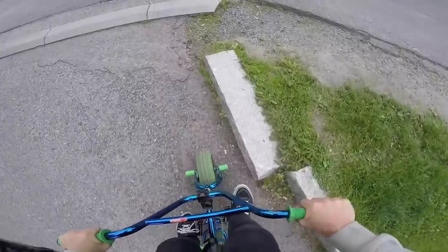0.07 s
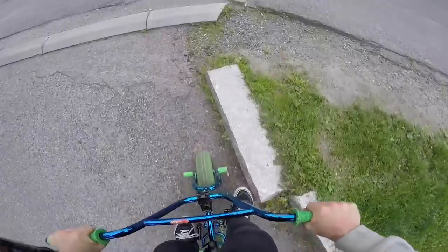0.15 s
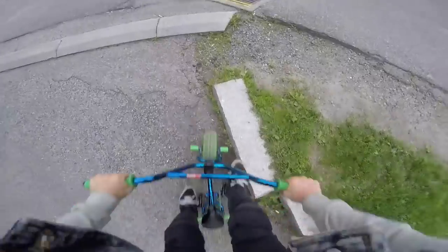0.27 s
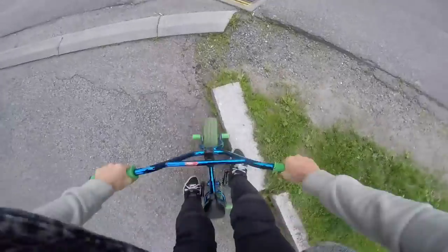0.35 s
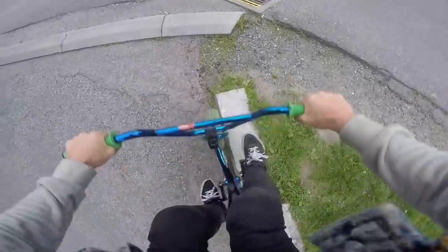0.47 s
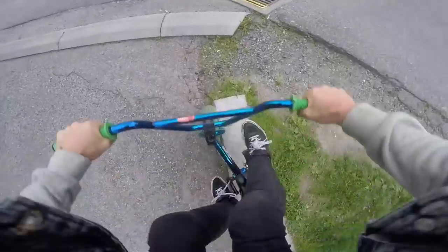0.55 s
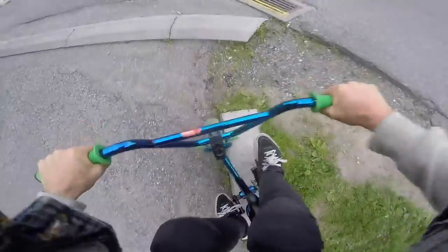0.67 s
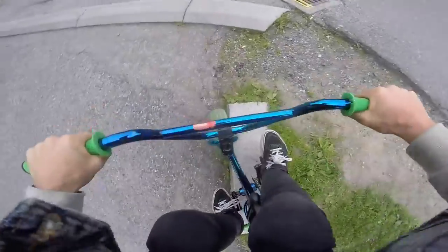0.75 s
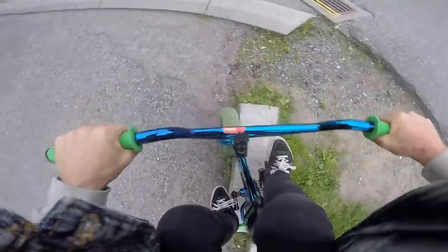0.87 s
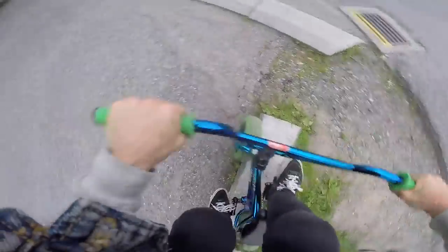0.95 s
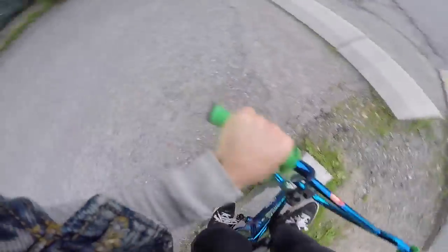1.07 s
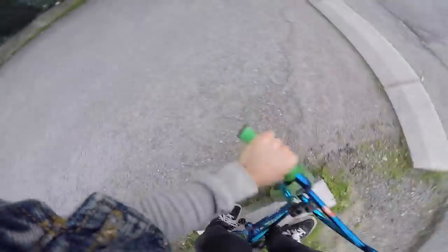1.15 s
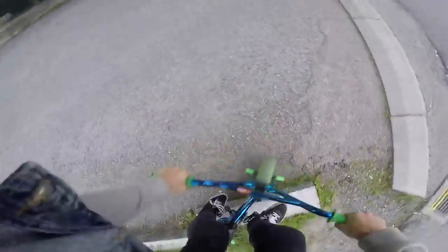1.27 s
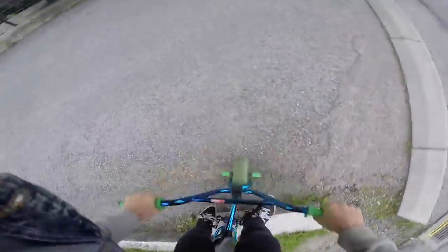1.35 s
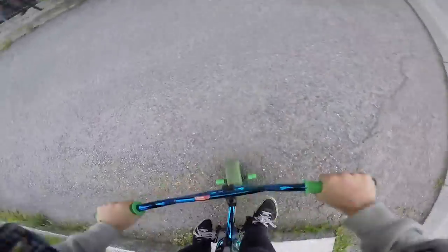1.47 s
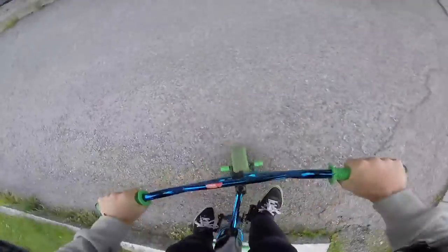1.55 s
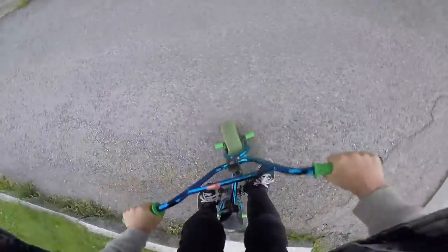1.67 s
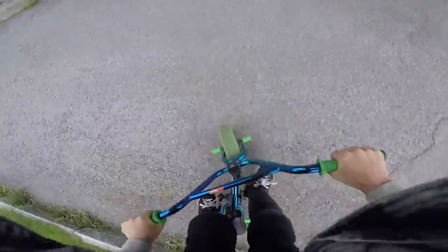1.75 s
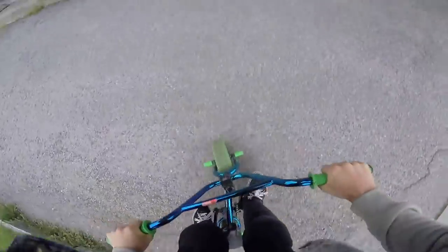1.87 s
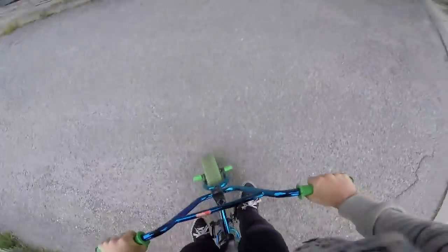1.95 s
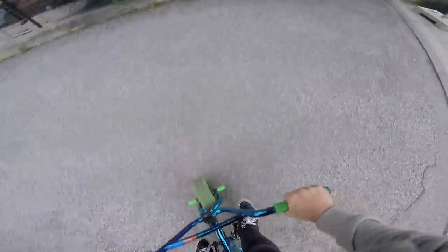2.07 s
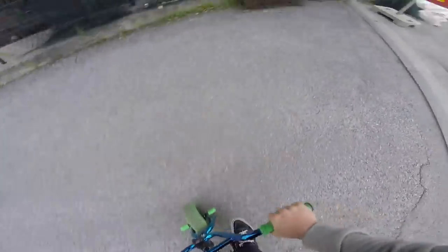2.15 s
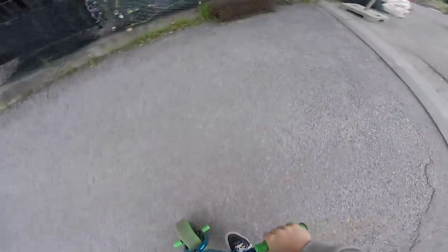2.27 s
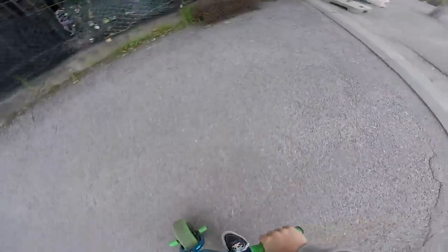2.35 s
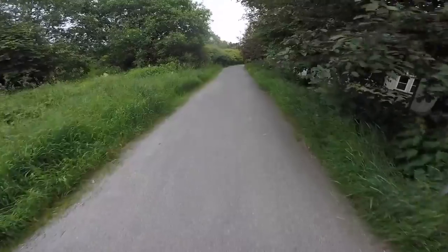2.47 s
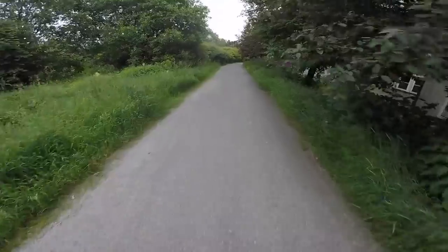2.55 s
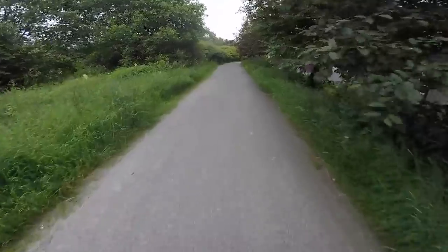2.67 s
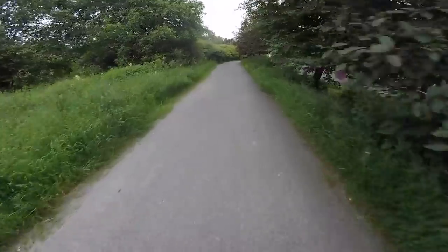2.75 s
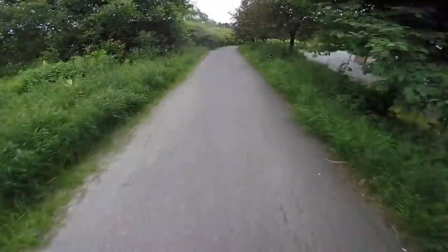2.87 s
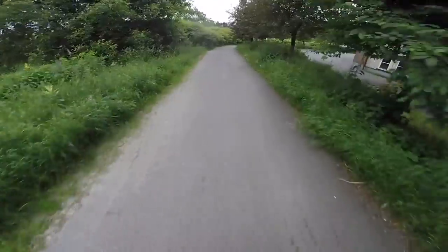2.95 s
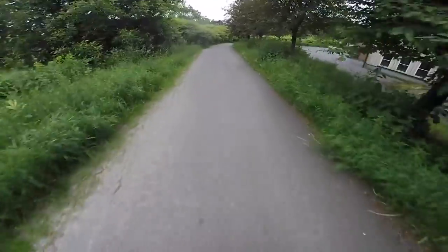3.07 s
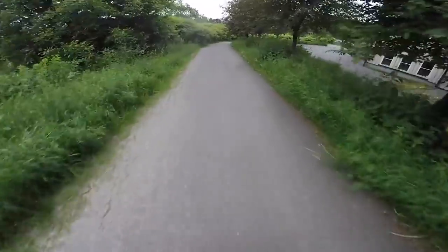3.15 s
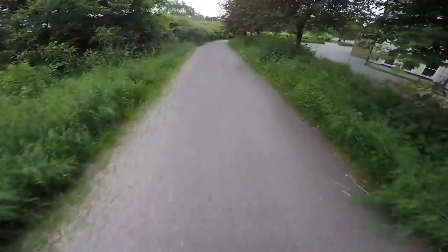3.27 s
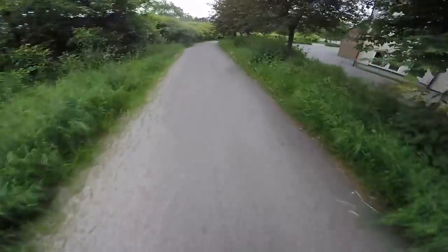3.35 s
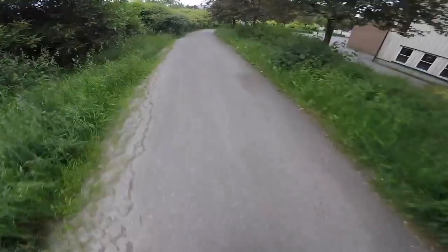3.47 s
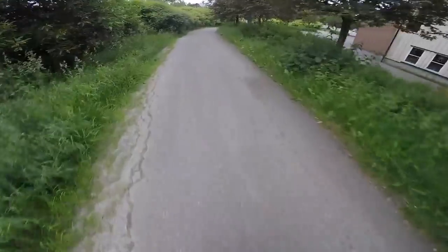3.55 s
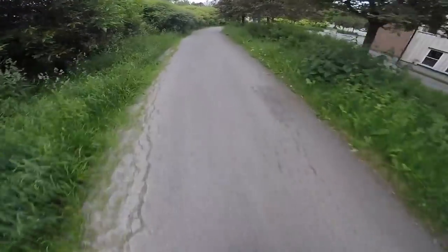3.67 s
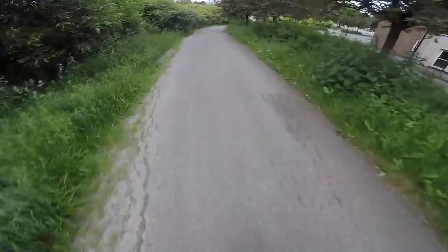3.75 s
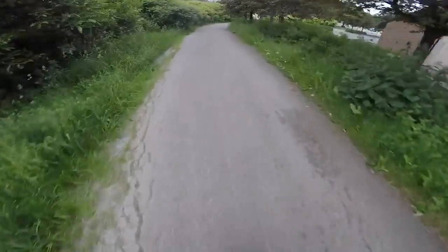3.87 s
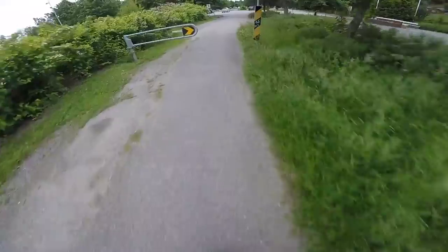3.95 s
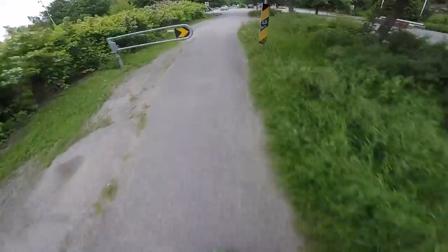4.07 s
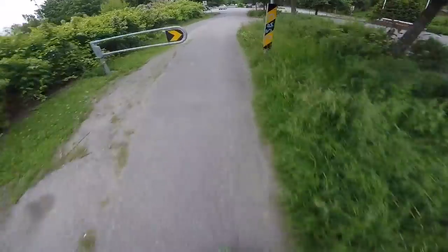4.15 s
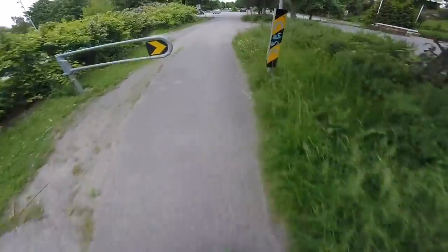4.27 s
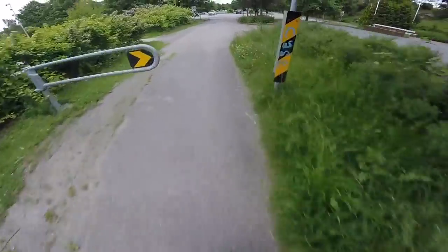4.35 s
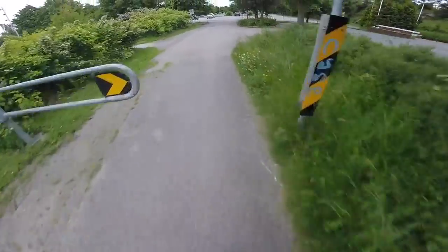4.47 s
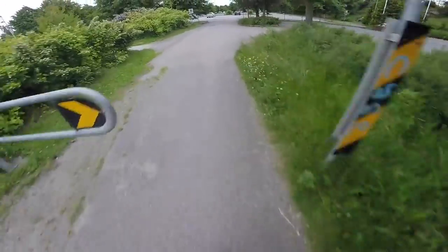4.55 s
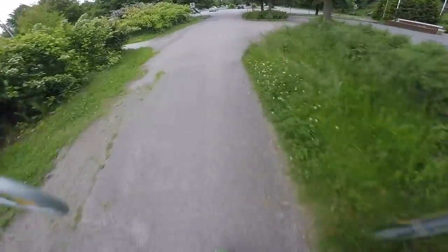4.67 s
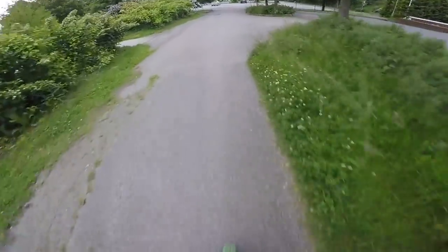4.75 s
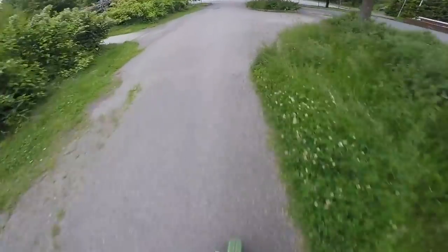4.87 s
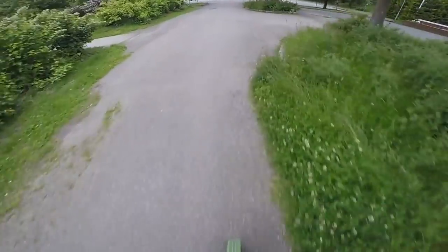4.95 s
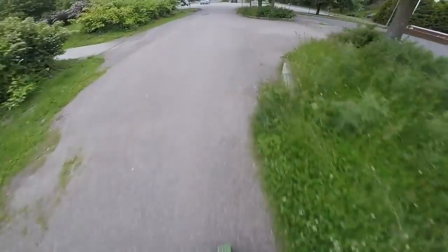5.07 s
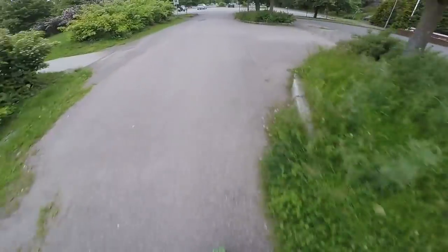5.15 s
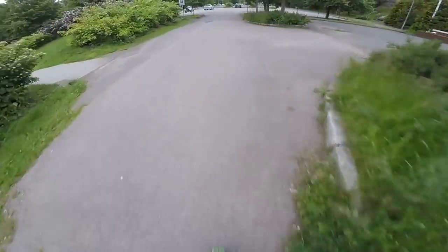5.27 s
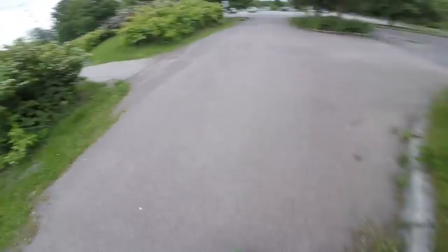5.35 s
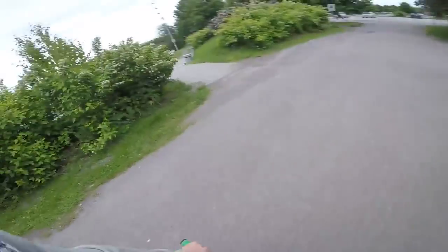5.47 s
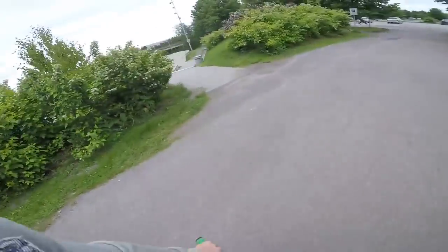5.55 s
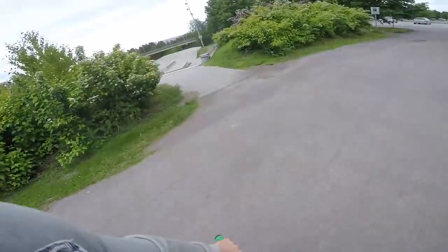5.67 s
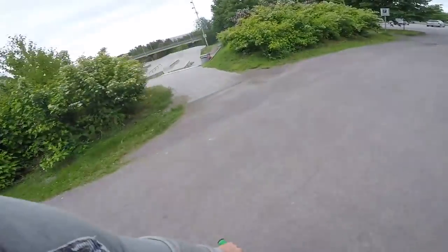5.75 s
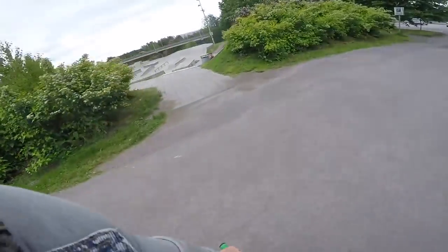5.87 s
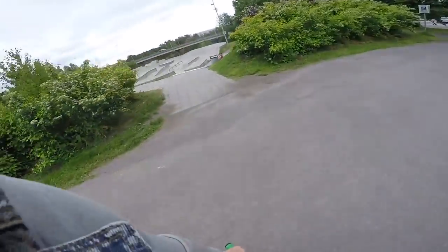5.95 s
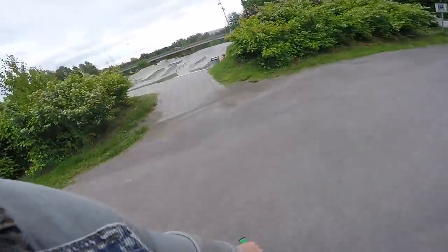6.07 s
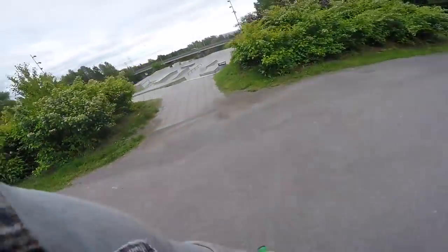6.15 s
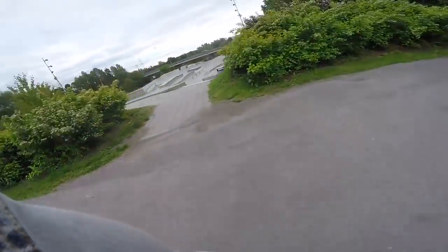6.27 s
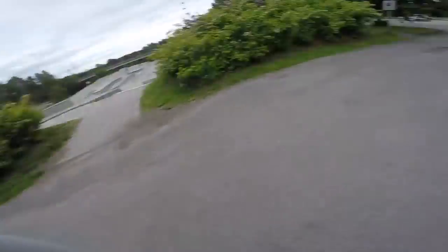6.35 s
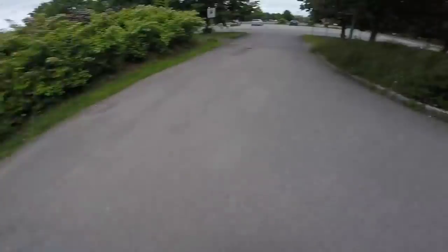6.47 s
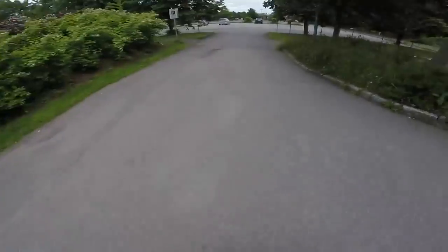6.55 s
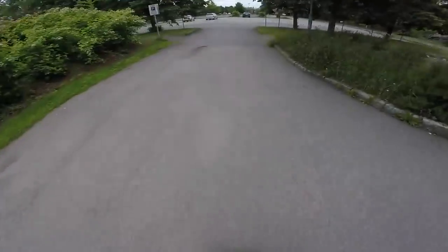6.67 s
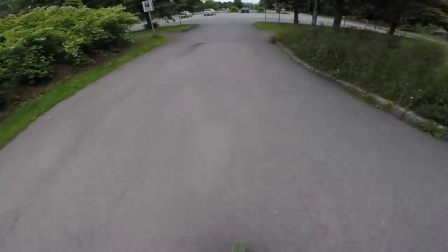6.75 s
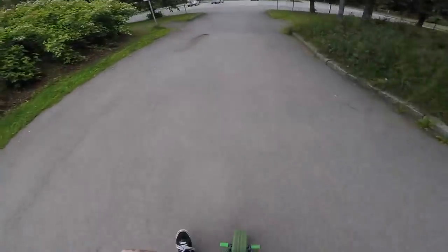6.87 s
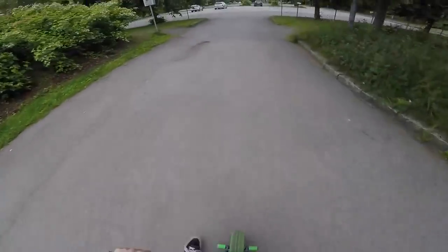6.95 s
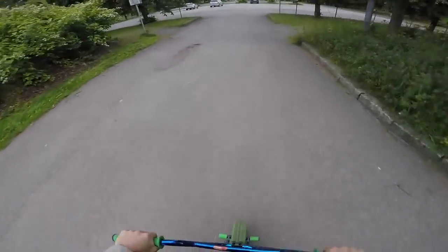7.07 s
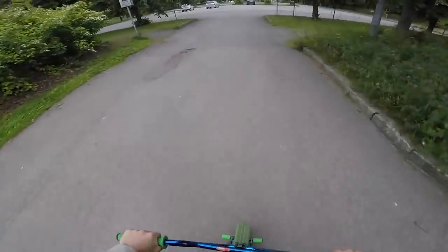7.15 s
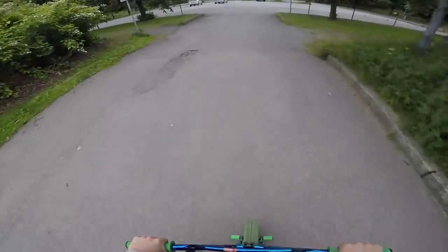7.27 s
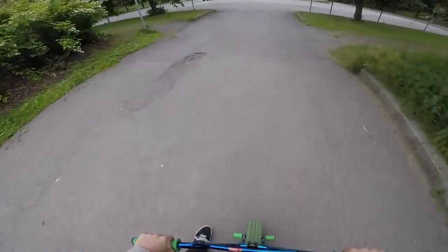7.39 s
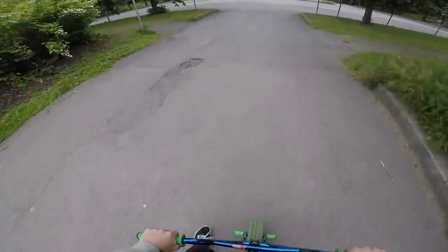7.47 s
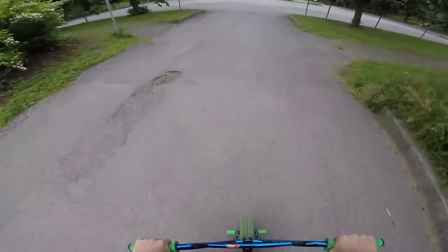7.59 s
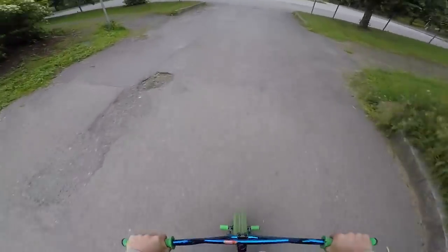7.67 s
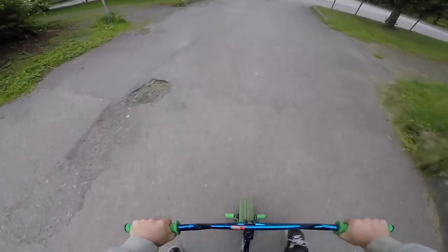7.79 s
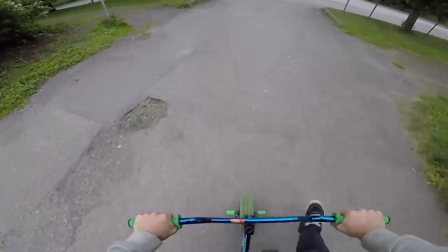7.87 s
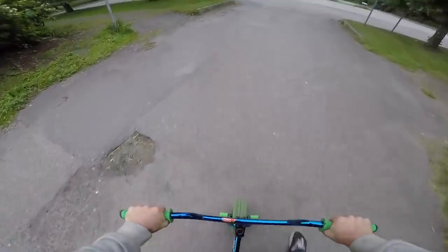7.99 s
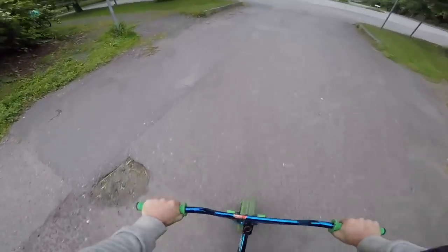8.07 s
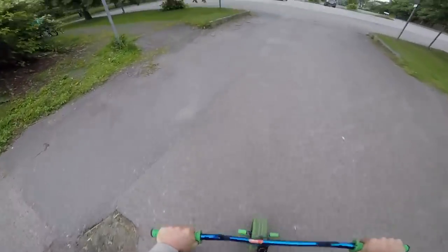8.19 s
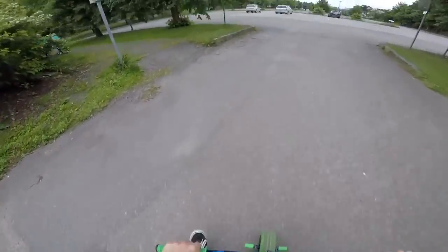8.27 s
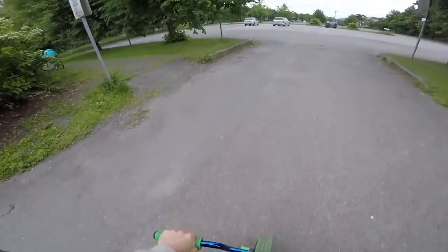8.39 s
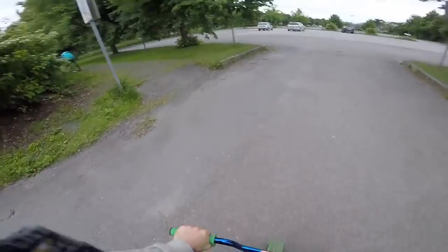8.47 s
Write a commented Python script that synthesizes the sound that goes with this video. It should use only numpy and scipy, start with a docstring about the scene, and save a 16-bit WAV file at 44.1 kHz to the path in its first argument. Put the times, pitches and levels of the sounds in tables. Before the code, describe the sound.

Close on-rider bike ride outdoors: rubber chirps and scuffs at a kerb, ratcheting hub whirr, wind roar, a tyre skid and frame knocks.

```python
"""The wheels of a small stunt bike, heard close by from on the rider: each ratchet tooth clicks and rings the hub.
Their speed drives the ticking and buzzing freewheel and the loudness of the tyres pattering on asphalt.
Loose grit and pebbles snap, rubber chirps and scuffs on a kerb stone, one tyre skids for about half a second,
and knocks ring the frame. Around it all, wind built from shaped noise buffets, slaps and roars at the microphone.
"""
import sys
import numpy as np
from scipy import signal
from scipy.fft import rfft, irfft
from scipy.io import wavfile
from scipy.ndimage import uniform_filter1d

SR = 44100
rng = np.random.default_rng(int(sys.argv[2]) if len(sys.argv) > 2 else 0)


def file_out(sig):
    """Save sig as 16-bit WAV at sys.argv[1]."""
    # one column per channel
    cols = np.atleast_2d(sig).T
    # limit, then scale
    lim = np.clip(cols, -1, 1)
    pcm = np.round(lim * 32767).astype(np.int16)
    wavfile.write(sys.argv[1], SR, pcm)


N = 375732
TIME = np.arange(N) / SR

# wheel speed: time_s, ratchet teeth per second
WHEEL_SPEED = [(0, 57), (.39, 53), (.46, 12.9), (.68, 58), (.78, 2.9), (1.2, 8.3), (1.7, 45), (1.87, 36),
               (2.02, 58), (2.2, 36), (2.53, 78), (2.55, 139), (4.01, 146), (4.03, 178), (5.3, 228),
               (6.6, 188), (6.72, 107), (7.7, 149), (8.3, 102)]
# the freewheel is silent while the rider stands at the kerb and pedals off
PEDALLING_FROM_S, PEDALLING_UNTIL_S = .72, 1.69
# growth of level with each doubling of speed
HUB_DB_PER_DOUBLING, ROLL_DB_PER_DOUBLING = 2.5, 3.5

# spectrum of a click of the pawls (the small catches in the hub): pitch_hz, level_db
PAWL_COLOUR = [(600, -12.5), (2600, -10.5), (3300, -5), (4800, -1.5), (5700, -4.5), (6500, -10.5),
               (7250, -12), (8000, -13.5), (9600, -11.5), (11000, -13), (12200, -4), (13000, -13),
               (14400, -10.5), (15300, -21)]
# decay times of tick and rattle; levels of the rattle and of the sliding between ticks
PAWL_TICK_S, PAWL_RATTLE_S, PAWL_RATTLE_DB, PAWL_SLIDE_DB = .0014, .004, -22, -23
# ringing of the hub shell and sprocket: pitch_hz, width_hz, level_db
HUB_MODES = [(3380, 200, -6), (3410, 30, 5), (3980, 130, -3), (4025, 20, 8), (4700, 400, -7), (5202, 24, 5),
             (5296, 20, 6), (5500, 600, -8), (7180, 320, -3), (8480, 160, -9), (8950, 150, -7),
             (9292, 22, 0), (9510, 60, 2), (10450, 130, -7), (11450, 110, -9), (12250, 750, -2),
             (15150, 350, -4)]
# pitches that stand out or fade in the wheel's ring; the first is perhaps a faint brake squeak:
# centre_s, half_length_s, pitch_hz, change_db
RING_SWELLS = [(0.617, .07, 10900, 15), (2.703, .3, 7230, 6.5), (2.85, 0.47, 4000, 6.5),
               (3.552, 0.52, 3410, 5.5), (3.822, 0.2, 12800, 0.5), (4.95, 0.49, 3410, 4.5),
               (5.2, 0.3, 4000, 6.5), (5.4, 1, 5300, 4.5), (6.05, 0.54, 7230, 7.5), (6.15, 0.32, 10900, 11),
               (6.25, 0.35, 4300, -12), (6.248, .2, 9400, -7), (7.85, 0.68, 5300, 6.5)]
RING_SWELL_OCTAVES = .13  # a swell changes the modes this close to its pitch
# how well the microphone faces the rear hub: time_s, level_db
HUB_AIM = [(1.7, 0), (2.53, 0.5), (2.55, 1.5), (4.01, 1.5), (4.03, -3.5), (5.2, -3), (5.7, -6.5),
           (7.5, -7.5), (7.9, 0.5), (8.52, -3)]
# the rider's body screens the wheels: from, until, time to turn away, time to turn back, depth
SCREEN_FROM_S, SCREEN_UNTIL_S, SCREEN_IN_S, SCREEN_OUT_S, SCREEN_DB = 6.06, 6.4, 0.06, 0.33, -7
# pitches that partly cancel on the way from the wheels: pitch_hz, width_hz
HOLLOWS = [(1450, 220), (2750, 250), (3680, 220), (4270, 160), (6650, 400), (8100, 450), (11000, 450)]
HOLLOW_DB = -4.5
# the wheels' reflection off the road: gain, delay, wander of the delay
WHEEL_ECHO, WHEEL_ECHO_S, ECHO_WANDER_S = .22, .0017, .00006

# spectrum of tread on asphalt: pitch_hz, level_db
TREAD_COLOUR = [(80, -21.5), (250, 9), (550, 3), (1150, 0.5), (1450, 3), (1850, 0), (2500, -5),
                (3300, -4.5), (5000, -9), (9000, -17.5), (15000, -18.5)]
# coarseness of the asphalt, stretch by stretch: start_s, level_db
SURFACES = [(0, 1.5), (2.54, -1), (4.02, -1.5), (5.42, -7), (6.05, -8), (6.6, -4)]
# spectrum of crushed grit: pitch_hz, level_db
STONE_COLOUR = [(400, -12), (1300, 0.5), (2000, -4.5), (2800, 0), (3700, -3), (4900, -9), (6500, -27),
                (15000, -24)]
# patches of loose grit: start_s, length_s, level_db
GRIT_PATCHES = [(0, 0.35, -39), (0.113, 0.26, -35), (1.527, 0.018, -30.5), (1.649, 0.43, -36.5),
                (2.35, 0.93, -61)]
GRIT_ATTACK_S, GRIT_RELEASE_S = 0.021, 0.059
# single stones snapping under the tread: start_s, relative_level_db, ring_pitch_hz
PEBBLES = [(0.1399, -13.5, 2800), (.153, -19, 3050), (0.204, -17, 2900), (0.244, -19, 2980),
           (0.3343, -19, 3300), (0.3665, -20, 2900), (1.383, -18, 1290), (1.505, -12.5, 3380),
           (1.544, -13, 3000), (1.5767, -21, 2800), (1.6333, -11, 2850), (1.6865, -21, 2810),
           (1.7604, -12, 3880), (1.779, -10, 2680), (1.944, -13.5, 1760), (2.0783, -23.5, 3400),
           (2.425, -22, 2800), (7.03, -13, 4440)]
PEBBLE_RING_DB, PEBBLE_WIDTH_HZ = 5, 370

# spectrum of sliding rubber: pitch_hz, level_db
SKID_COLOUR = [(210, -41), (350, -4.5), (502, -8), (570, -1.5), (721, -6), (831, -4), (1090, -6),
               (1460, -6.5), (1900, -11), (2350, -20), (2830, -22.5), (4130, -16.5), (5400, -24.5),
               (6520, -32), (15000, -35.5)]
# the tyre locks, bites hardest, starts to let go, rolls again
SKID_START_S, SKID_BITE_S, SKID_EASE_S, SKID_END_S = 6.992, 7.18, 7.535, 7.643
SKID_ATTACK_S, SKID_RELEASE_S = 0.0014, 0.091
# weight comes onto the tyre: level at full bite, swell up to it
ROAR_DB, ROAR_SWELL_DB_PER_S = -18.5, 35
# the slide dulls as it slows: brightness (see tilted) and its fall
SKID_TILT_DB, SKID_DULLING_DB_PER_S = -1, 4.5
# harsh rasp under full weight, falling in pitch as the tyre slows: centre, half length, level, fall
RASP_S, RASP_HALF_S, RASP_DB, RASP_FALL_OCTAVES_PER_S = 7.41, 0.16, -33, 1.9
# short dips in level as the tyre hops: centre_s, half_length_s, dip_db
HOPS = [(7.064, 0.013, -7.5), (7.199, 0.044, -6)]
# rough squeals within the skid: centre_s, half_length_s, pitch_hz, level_db
SQUEALS = [(7.138, 0.052, 1810, -31), (7.312, 0.072, 1805, -25.5), (7.37, 0.088, 1071, -24),
           (7.43, 0.056, 653, -21.5), (7.62, .02, 1700, -24), (7.468, .07, 1400, -36),
           (7.522, 0.064, 755, -18.5)]
SQUEAL_FALL_OCTAVES_PER_S = 1.6
# reflection off the road as the wheel swings out: gain, delay (s), growth of the delay (s per s squared)
ROAD_BOUNCE, BOUNCE_DELAY_S, BOUNCE_GROWTH = .28, .0011, .0038

# blows on the bike, and a soft low bump at 2.543 s just before the wheel sound jumps in speed:
# start_s, strength_db, contact_decay_s, frame_db, thump_db, crack_db, handlebar_ring_db, clack_pitch_hz, clack_db
KNOCKS = [(0.7027, 0.5, 0.003, -4, 3, 6.5, 0, 2680, 14),
          (1.4265, -9, 0.0016, -0.5, -36, -10, -18, 1550, 21.5),
          (2.543, -25.5, 0.0017, -5, -1, -9, -30, 1101, 6),
          (4.497, -23, .0015, 3.5, -10, -20, -25, 1400, 14),
          (5.075, -18.5, 0.0028, 0.5, -5, -35, -22.5, 790, 6),
          (7.849, -5, 0.01, 0, -31, -44, -24, 1390, -3),
          (7.864, -4.5, 0.0059, -0.5, -17, -45, -21, 1070, 6.5),
          (8.0591, 3, 0.0022, 0, -17, -21, -28, 1710, 13.5),
          (8.3971, 4.5, 0.0016, 1, -17, -28, -30, 2970, 3.5)]
CLACK_WIDTH_HZ = 450
# what the frame and wheels ring with: pitch_hz, width_hz, level_db
FRAME_MODES = [(552, 99, -0.5), (732, 190, -2), (1005, 141, -1.5), (1120, 57, -7.5), (1440, 50, -11),
               (1780, 50, -15)]
# long ring of the handlebar: pitch_hz, time_to_fall_60_db_s, level_db
HANDLEBAR_MODES = [(637, 0.25, -25.5), (1170, 0.2, -39), (1310, 0.33, -43), (3390, 0.5, -45),
                   (3470, 0.44, -36.5), (4070, 0.18, -35)]
# what a tyre thumps with: pitch_hz, time_to_fall_60_db_s, level_db
THUMP_MODES = [(38, 0.53, -14), (145, 0.13, -15), (271, 0.055, 1.5), (344, 0.045, 0.5)]
# spectrum of the crack of a knock: pitch_hz, level_db
CRACK_COLOUR = [(500, 22.0), (2200, 3.5), (3400, 8.5), (5000, 0.5), (7000, -10), (11000, -18), (15000, -10)]

# short scrapes of rubber and shoes on stone: peak_s, level_db, rise_s, decay_s, brightness_db (see tilted)
SCUFFS = [(.54, -36, .012, 0.05, 6), (0.639, -23.5, 0.005, 0.0089, -11), (0.669, -19, 0.0033, 0.01, -2),
          (0.723, -29.5, 0.0074, 0.031, 0), (1.253, -23.5, 0.022, 0.014, -3.5),
          (1.262, -19.5, 0.0011, 0.013, -1.5), (1.301, -32, 0.005, 0.03, 10), (1.19, -38, 0.0044, 0.014, 6),
          (1.367, -27.5, 0.0027, 0.024, 0.5), (1.434, -25.5, 0.0045, 0.017, -1),
          (1.503, -18, 0.0012, 0.013, 11), (1.748, -20, 0.0031, 0.024, 0), (1.946, -21, 0.0025, 0.0057, 2),
          (7.004, -18.5, 0.0067, 0.0079, -3), (7.086, -19, 0.00093, 0.04, -7),
          (8.129, -27.5, 0.012, 0.006, 8), (8.362, -21.5, 0.0042, 0.0064, -3)]
# front tyre chirping on the kerb: centre_s, half_length_s, stick_slip_rate_hz, level_db
CHIRPS = [(1.231, .004, 1092, -23), (1.247, 0.0023, 905, -15.5), (1.2554, 0.003, 980, -8),
          (1.263, 0.0042, 1021, -14.5)]
CHIRP_SAG_HZ_PER_S = 3600

# spectrum of the buffeting: pitch_hz, level_db
BUFFET_COLOUR = [(12, -13.5), (25, 3.5), (52, 1), (85, -4), (130, -15), (220, -39.5), (500, -63),
                 (2500, -110)]
# steady airflow at the microphone: time_s, slow_buffeting_db, small_eddy_rush_db (rush before wind's rush gain)
AIRFLOW = [(.1, -37, -57), (.42, -22, -40.5), (.95, -37, -49), (1.18, -21.5, -25.5), (1.37, -27, -40.5),
           (1.46, -34, -50), (1.56, -27.5, -43), (2.52, -33, -49.5), (2.55, -26.5, -56), (2.9, -27.5, -56),
           (3.02, -17.5, -37), (3.7, -19, -32.5), (3.93, -28.5, -44), (4.25, -17, -26.5),
           (5.42, -18.5, -30.5), (5.52, -26.5, -26.5), (5.82, -15.5, -19), (5.95, -16.5, -20),
           (6.1, -15, -15.5), (6.3, -20, -18.5), (6.48, -16.5, -19.5), (6.7, -14.5, -20),
           (6.88, -16.5, -26), (7.4, -15.5, -24), (7.9, -18, -25.5), (8.35, -14.5, -21), (8.52, -36, -18)]
# gusts of air, and a short low thump at 2.55 s as the wheel sound jumps in speed:
# peak_s, half_length_s, buffeting_db, rush_db (rush before wind's rush gain)
GUSTS = [(0.677, 0.068, -23.5, -24.5), (1.087, 0.034, -14, -15.5), (1.32, 0.014, -12, -34),
         (1.731, 0.055, -22, -32.5), (2.55, 0.011, -23, -32), (2.788, 0.04, -22, -42.5),
         (2.976, 0.033, -14.5, -39), (3.398, 0.062, -14.5, -23.5), (3.582, 0.12, -16.5, -16),
         (4.035, 0.017, -15, -26), (4.274, 0.03, -13, -15), (4.389, 0.029, -8.5, -16),
         (4.621, 0.062, -14, -18.5), (4.758, 0.03, -10.5, -22.5), (4.89, 0.031, -8, -16),
         (5.135, 0.12, -15.5, -22), (5.322, 0.022, -9.5, -15), (5.492, 0.017, -7, -21),
         (7.622, 0.015, -32, -16.5), (7.784, 0.047, -14.5, -50), (8.321, 0.031, -11, -15)]
GUST_RISE_SHARE = 0.84  # each rises in this share of the time it takes to fall
# turns of the head across the airflow, which shift the eddy pitch: centre_s, half_length_s, shift_octaves
HEAD_TURNS = [(1.098, 0.13, -1.9), (3.496, 0.22, -0.28), (5.593, 0.18, 0.8), (5.854, 0.06, 1.2),
              (5.984, 0.066, 1.15), (6.424, 0.039, 1.65), (6.526, 0.046, 1.48)]
# sharp slaps of air: centre_s, relative_level_db
SLAPS = [(4.283, -8), (4.338, -8), (4.406, -10), (4.638, -10.5), (4.901, -8), (5.117, -11), (5.16, -10),
         (5.494, -7), (5.531, -6), (6.659, -12.5), (8.172, -9.5), (8.303, -11)]
SLAP_HALF_S, SLAP_DECAY_S = .001, .008
# wind across the turned head, its pitch following the angle: time_s, level_db, pitch_hz
CROSSWIND = [(5.45, -50, 300.4), (5.55, -22.5, 329.8), (5.78, -21, 320.4), (5.84, -13.5, 480.5),
             (5.91, -18.5, 429.5), (5.98, -20.5, 521), (6.03, -10, 381.7), (6.1, -14, 308.4),
             (6.2, -14.5, 319.3), (6.28, -14, 441), (6.36, -15, 360.4), (6.42, -16.5, 477.3),
             (6.5, -23, 379), (6.55, -22, 380.2), (6.63, -28.5, 372.3), (6.78, -26.5, 302), (7, -43, 279.5)]
# spectrum of that roar at its middle pitch: pitch_hz, level_db
CROSSWIND_COLOUR = [(60, -23), (170, -1.5), (320, -0.5), (480, -2.5), (680, -11.5), (1000, -21.5),
                    (2000, -37), (4000, -64)]
CROSSWIND_HZ = 400  # middle pitch

TOP_HZ = 15400  # upper limit of the sound


def wheels():
    """Hub and tyres arrive past the frame and off the road: hollow bands, and ridges that drift."""
    out = freewheel() + tyres()
    for hz, width in HOLLOWS:
        out = out - (1 - amp(HOLLOW_DB)) * resonate(out, hz, width)
    lag = np.round(SR * (WHEEL_ECHO_S + ECHO_WANDER_S * walk(2.5))).astype(int)
    echo = out[np.clip(np.arange(N) - lag, 0, N - 1)]
    return out + WHEEL_ECHO * echo


def freewheel(scatter_db=1.5, level_db=-33, shade_db=-4):
    """Pawls drop off each ratchet tooth with a sharp tick and a brief rattle that ring the hub."""
    coasting = (TIME < PEDALLING_FROM_S) | (TIME > PEDALLING_UNTIL_S)
    rate = np.maximum(curve(WHEEL_SPEED), 0) * coasting
    uneven_rate = rate * (1 + .012 * walk(90))
    teeth = np.floor(np.cumsum(uneven_rate) / SR)
    # one impulse each time the tooth count steps up
    drops = np.diff(teeth, prepend=0) * amp(scatter_db * noise()) / np.sqrt(np.maximum(rate, 35))
    # the pawls do not land quite together, which spreads each tick over about a millisecond
    tick = fading(uniform_filter1d(drops, size=50), PAWL_TICK_S)
    rattle = fading(drops, PAWL_RATTLE_S)
    # the pawls also slide up the teeth, louder at speed
    slide = amp(PAWL_SLIDE_DB) * (rate / 55 + .15) * coasting
    force = unit(tick + amp(PAWL_RATTLE_DB) * rattle) + slide
    force = force * wheel_gain(HUB_DB_PER_DOUBLING) * amp(curve(HUB_AIM) + level_db)
    # the rider's body dulls the clicks a little more than the ring
    clicks = colour(force * noise(), PAWL_COLOUR) * amp(shade_db * screen())
    return clicks + hub_ring(force)


def hub_ring(force, waver_db=1.94, drift=0.00099):
    """The turning hub shows each of its modes more or less, slightly off pitch as it flexes."""
    out = 0
    for hz, width, db in HUB_MODES:
        swell = 0
        for s, half, near_hz, change_db in RING_SWELLS:
            if abs(np.log2(near_hz / hz)) < RING_SWELL_OCTAVES:
                swell = swell + change_db * bump(s, half)
        out = out + resonate(force * noise(), hz, width) * amp(db + swell + waver_db * walk(7))
    # read the sound at a swaying position, on a doubled grid for accuracy
    fine = signal.resample_poly(out, 2, 1)
    sway = np.sin(2 * np.pi * np.cumsum(5 + walk(3)) / SR)
    flex = np.cumsum(drift * sway)
    return np.interp(2 * (np.arange(N) + flex), np.arange(2 * N), fine)


def wheel_gain(db_per_doubling):
    """Wheels grow louder with speed (gain 1 at 100 teeth a second) and fainter behind the rider's body."""
    doublings = np.log2(np.maximum(curve(WHEEL_SPEED), 1) / 100)
    return amp(db_per_doubling * doublings + SCREEN_DB * screen())


def screen():
    """How far the rider's body blocks the wheels, from 0 to 1."""
    return held(SCREEN_FROM_S, SCREEN_UNTIL_S, SCREEN_IN_S, SCREEN_OUT_S)


def tyres(roll_db=-37, patchy_db=2.5):
    """Tread patters over the asphalt grain and crunches through patches of loose grit."""
    patter = unit(colour(grains(rate=3600, spread_db=2.5), TREAD_COLOUR))
    patter = patter * wheel_gain(ROLL_DB_PER_DOUBLING) * amp(roll_db + surface() + 1.34 * walk(25))
    # each crushed grain is a very short burst of noise
    crumble = np.exp(-TIME[:512] / .0007)
    cracks = signal.oaconvolve(np.abs(grains(rate=560, spread_db=3.1)), crumble)[:N] * noise()
    crunch = unit(colour(cracks, STONE_COLOUR) * amp(patchy_db * walk(36.56)))
    patches = [amp(db) * held(s, s + length, GRIT_ATTACK_S, GRIT_RELEASE_S) for s, length, db in GRIT_PATCHES]
    return patter + crunch * np.max(patches, axis=0)


def surface():
    """Level (dB) of the stretch of asphalt under the tyres."""
    db = np.zeros(N)
    for s, level_db in SURFACES:
        db[TIME >= s] = level_db
    return uniform_filter1d(db, size=2000)


def pebbles(decay_s=0.0015, level_db=3, size=2048):
    """A stone cracks out from under the tread, each with its own brief ring."""
    snaps, rings = np.zeros((2, N + size))
    for s, db, hz in PEBBLES:
        span = slice(int(s * SR), int(s * SR) + size)
        snap = amp(db) * rng.standard_normal(size) * np.exp(-TIME[:size] / decay_s)
        snaps[span] += snap
        rings[span] += resonate(snap, hz, PEBBLE_WIDTH_HZ)
    return amp(level_db) * (.5 * colour(snaps[:N], STONE_COLOUR) + amp(PEBBLE_RING_DB) * rings[:N])


def skid(judder_db=1.35, rasp_hz=3400, rasp_width_hz=2000):
    """A tyre drags over asphalt, swelling, dulling and juddering; its road reflection sweeps through it."""
    age = np.clip(TIME, SKID_START_S, SKID_END_S) - SKID_START_S
    past_bite = SKID_START_S + age - SKID_BITE_S
    hops = sum(db * bump(s, half) for s, half, db in HOPS)
    contact = held(SKID_START_S, SKID_EASE_S, SKID_ATTACK_S, SKID_RELEASE_S)
    contact = contact * (TIME < SKID_END_S) * amp(hops)

    tilt = SKID_TILT_DB - SKID_DULLING_DB_PER_S * np.maximum(past_bite, 0)
    roar = tilted(sliding(), tilt) * amp(ROAR_DB + ROAR_SWELL_DB_PER_S * np.minimum(past_bite, 0))

    rasp = grains(rate=2800, spread_db=-5)
    rasp = unit(resonate(resonate(rasp, rasp_hz, rasp_width_hz), rasp_hz, rasp_width_hz))
    rasp = glide(rasp, 2 ** (RASP_FALL_OCTAVES_PER_S * (RASP_S - SKID_START_S - age)))
    rasp = rasp * amp(RASP_DB) * bump(RASP_S, RASP_HALF_S)

    direct = (roar + rasp + squeals()) * contact * amp(judder_db * walk(110))
    delay = BOUNCE_DELAY_S + BOUNCE_GROWTH * age ** 2
    return direct + ROAD_BOUNCE * np.interp(TIME - delay, TIME, direct)


def sliding():
    """Rubber catches and lets go on many stones at once."""
    return unit(colour(grains(rate=2400, spread_db=2.2), SKID_COLOUR))


def squeals(width_hz=150):
    """Patches of tread sing roughly for a moment, each sinking in pitch as the tyre slows."""
    out = 0
    for s, half, hz, db in SQUEALS:
        pitch = hz * 2 ** (-SQUEAL_FALL_OCTAVES_PER_S * np.clip(TIME - s, -.5, .5))
        tone = np.sin(2 * np.pi * np.cumsum(pitch + width_hz * walk(400)) / SR)
        out = out + unit(tone * amp(2 * walk(150))) * amp(db) * bump(s, half)
    return out


def knocks(frame_gain_db=9, crack_gain_db=-2, size=30000):
    """A push and a clatter excite frame rings, cracks and a clack, joined by low thumps and a handlebar ring."""
    push, snap, rings = np.zeros((3, N + size))
    t = np.arange(size) / SR
    handlebar, thump = dying_tones(HANDLEBAR_MODES, t), dying_tones(THUMP_MODES, t)
    shove = np.exp(-((t - .001) / .0002) ** 2)
    for s, db, decay, frame_db, thump_db, crack_db, ring_db, clack_hz, clack_db in KNOCKS:
        span = slice(int(s * SR), int(s * SR) + size)
        envelope = np.exp(-t / decay) * (1 - np.exp(-t / .0004))
        clatter = amp(db) * rng.standard_normal(size) * envelope
        push[span] += amp(frame_db) * (amp(db) * shove + clatter)
        snap[span] += amp(crack_db) * clatter
        rings[span] += amp(db + thump_db) * thump + amp(db + ring_db) * handlebar
        clack = resonate(resonate(clatter, clack_hz, CLACK_WIDTH_HZ), clack_hz, 2 * CLACK_WIDTH_HZ)
        rings[span] += amp(clack_db) * clack
    frame = sum(amp(db) * resonate(push[:N], hz, width) for hz, width, db in FRAME_MODES)
    cracks = colour(snap[:N], CRACK_COLOUR)
    return amp(frame_gain_db) * frame + amp(crack_gain_db) * cracks + rings[:N]


def dying_tones(modes, t):
    """Struck solid: a sum of pure tones, each fading by 60 dB in its own time."""
    return sum(amp(db - 60 * t / t60) * np.sin(2 * np.pi * hz * t) for hz, t60, db in modes)


def scuffs():
    """Rubber and shoes slide briefly on stone, swelling and dying away."""
    slide = sliding()
    return sum(amp(db) * held(s, s, rise, decay) * unit(tilted(slide, tilt))
               for s, db, rise, decay, tilt in SCUFFS)


def chirp(rough=0.038, overtone_db=-22):
    """Rubber sticks and slips almost regularly for a moment, its pitch sagging."""
    out, jitter = 0, 1 + rough * walk(500)
    for s, half, hz, db in CHIRPS:
        pitch = (hz - CHIRP_SAG_HZ_PER_S * (TIME - s)) * jitter
        phase = 2 * np.pi * np.cumsum(pitch) / SR
        tone = np.sin(phase) + amp(overtone_db) * np.sin(2 * phase)
        out = out + tone * np.sqrt(2) * amp(db) * bump(s, half)
    return out


def wind(rush_gain_db=2, corner_hz=205, corner_octaves_per_db=-0.0013, steepness=4.77, flicker_db=3.0, sway_db=2.5):
    """Large eddies shake the microphone; small ones rush, their pitch shifting as the head turns."""
    shake_db, rush_db = air()
    buffet = unit(colour(noise(), BUFFET_COLOUR))
    buffet /= np.sqrt(uniform_filter1d(buffet ** 2, size=3000))  # even out its level
    turned = sum(octaves * bump(s, half) for s, half, octaves in HEAD_TURNS)
    # the pitch where the rush is centred hardly depends on its strength
    corner = corner_hz * 2 ** (corner_octaves_per_db * (np.maximum(rush_db, -30) + 22) + turned)
    eddies, power, burst = 0, 0, walk(70)
    for hz in np.geomspace(100, 3200, num=11):
        edges = [hz / 2 ** .25, hz * 2 ** .25]  # half an octave wide
        band = signal.sosfilt(signal.butter(3, edges, "band", fs=SR, output="sos"), noise())
        weight = np.sqrt(hz / (1 + (hz / corner) ** steepness) / (1 + (0.17 * corner / hz) ** 4))
        # small eddies come in bursts
        eddies = eddies + weight * unit(band * amp(flicker_db * burst))
        power = power + weight ** 2
    rush_gain = amp(rush_db + rush_gain_db) * (corner / corner_hz) ** 0.4
    return buffet * amp(shake_db + sway_db * walk(14)) + eddies / np.sqrt(power) * rush_gain


def air():
    """Levels of buffeting and rush (dB): each short surge adds its power to the steady airflow."""
    buffet, rush = amp(curve(AIRFLOW)) ** 2, amp(curve(AIRFLOW, column=2)) ** 2
    for s, half, buffet_db, rush_db in GUSTS:
        surge = bump(s, half, GUST_RISE_SHARE)
        buffet = buffet + (amp(buffet_db) * surge) ** 2
        rush = rush + (amp(rush_db) * surge) ** 2
    return 10 * np.log10(buffet), 10 * np.log10(rush)


def slaps(tear_db=-11, tear_hz=400, tear_width_hz=380):
    """An eddy bursts on the microphone: one swing of pressure and a short tearing flutter."""
    swing = sum(amp(db) * (s - TIME) / SLAP_HALF_S * bump(s, SLAP_HALF_S) for s, db in SLAPS)
    flutter = sum(amp(db) * held(s, s, SLAP_HALF_S, SLAP_DECAY_S) for s, db in SLAPS)
    tear = unit(resonate(resonate(noise(), tear_hz, tear_width_hz), tear_hz, 2 * tear_width_hz))
    return 2 * swing + amp(tear_db) * tear * flutter


def crosswind(flutter_db=0.5):
    """Air tears past the side of the microphone with a full, hollow roar of moving pitch."""
    roar = glide(unit(colour(noise(), CROSSWIND_COLOUR)), curve(CROSSWIND, column=2) / CROSSWIND_HZ)
    blowing = (TIME > CROSSWIND[0][0]) & (TIME < CROSSWIND[-1][0])
    return roar * blowing * amp(curve(CROSSWIND) + flutter_db * walk(60))


def amp(db):
    """Decibels to gain."""
    return 10 ** (np.asarray(db) / 20)


def curve(rows, column=1):
    """One column of a timed table, joined by straight lines."""
    rows = np.array(rows)
    return np.interp(TIME, rows[:, 0], rows[:, column])


def noise():
    """White noise."""
    return rng.standard_normal(N)


def unit(x):
    """Scale to an rms (average strength) of 1."""
    return x / np.sqrt(np.mean(x ** 2) + 1e-18)


def walk(rate):
    """Smooth random wandering around 0, with about this many new values a second."""
    k = max(int(SR / rate), 1)
    steps = np.repeat(rng.standard_normal(N // k + 1), k)
    return 1.2 * uniform_filter1d(steps, k)[:N]


def grains(rate, spread_db):
    """Random tiny impacts of uneven size, on average this many a second."""
    sizes = amp(spread_db * np.minimum(rng.exponential(size=N), 5))
    return unit((rng.random(N) < rate / SR) * sizes * rng.choice([-1, 1], N))


def bump(s, half_s, rise_share=1):
    """A smooth swell that peaks at 1."""
    age = (TIME - s) / half_s
    return np.exp(-np.minimum(np.where(age < 0, age / rise_share, age) ** 2, 60))


def held(start_s, end_s, attack_s, release_s):
    """Rise up to the start, hold at 1, fade after the end."""
    return np.exp(np.minimum((TIME - start_s) / attack_s, (end_s - TIME) / release_s).clip(-60, 0))


def fading(x, decay_s):
    """Let every impulse die away exponentially."""
    return signal.lfilter([1], [1, -np.exp(-1 / (decay_s * SR))], x)


def colour(x, points, size=8192):
    """Filter with the given (Hz, dB) response that never sounds ahead of its input."""
    hz, db = np.transpose(points)
    grid = np.maximum(np.fft.rfftfreq(size, 1 / SR), 1)
    # folding the cepstrum forward gives the filter its minimum delay
    cepstrum = irfft(np.log(amp(np.interp(np.log(grid), np.log(hz), db))))
    cepstrum[1:size // 2] *= 2
    cepstrum[size // 2 + 1:] = 0
    return signal.oaconvolve(x, irfft(np.exp(rfft(cepstrum))))[:N]


def resonate(x, hz, width_hz):
    """One resonance, gain 1 at its centre."""
    return signal.lfilter(*signal.iirpeak(hz, hz / width_hz, fs=SR), x)


def tilted(x, tilt_db):
    """Brighten: lower the part below 1 kHz by tilt_db and raise the rest by twice that."""
    low = signal.lfilter(*signal.butter(1, 1000, fs=SR), x)
    return low * amp(-tilt_db) + (x - low) * amp(2 * tilt_db)


def glide(x, ratio):
    """Raise or lower a steady sound's pitch by a moving ratio."""
    return np.interp(np.cumsum(ratio * np.ones(N)) % N, np.arange(N), x)


def scene():
    """Everything is close to the microphone, in open air."""
    bike = wheels() + pebbles() + skid() + knocks() + scuffs() + chirp()
    moving_air = wind() + slaps() + crosswind()
    return (bike + moving_air)[None]


def record(dry):
    """Round off the loudest peaks and cut everything above the top pitch."""
    rounded = dry / (1 + (dry / .9) ** 6) ** (1 / 6)
    return signal.sosfiltfilt(signal.ellip(8, .1, 50, TOP_HZ, fs=SR, output="sos"), rounded)


dry = scene()
out = record(dry)
file_out(out)
```